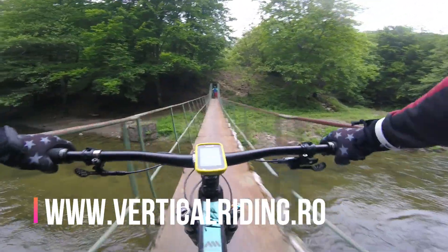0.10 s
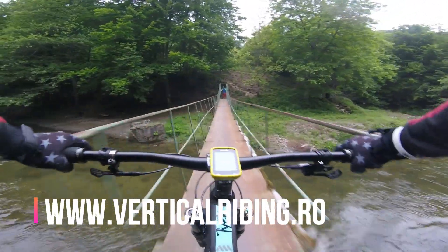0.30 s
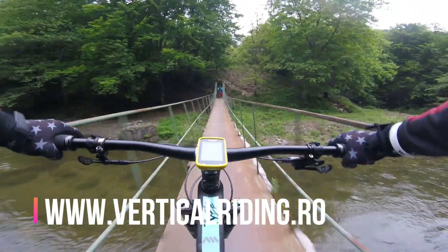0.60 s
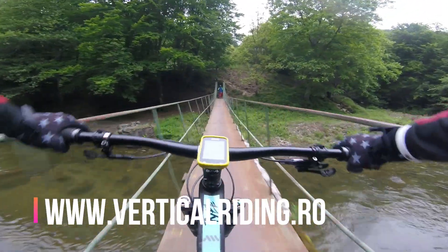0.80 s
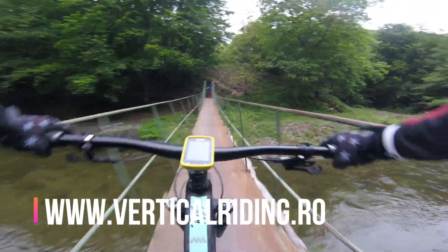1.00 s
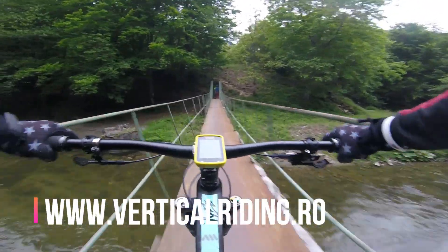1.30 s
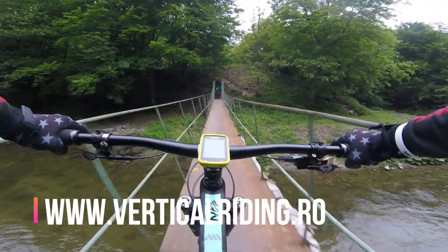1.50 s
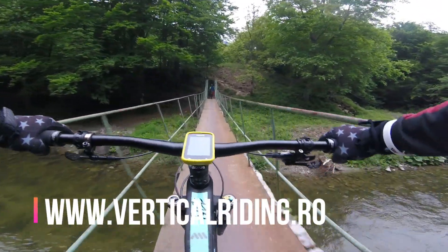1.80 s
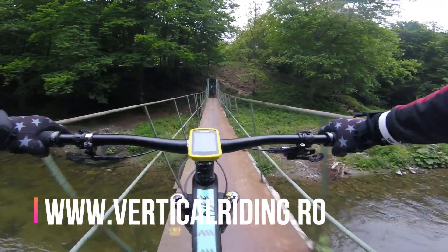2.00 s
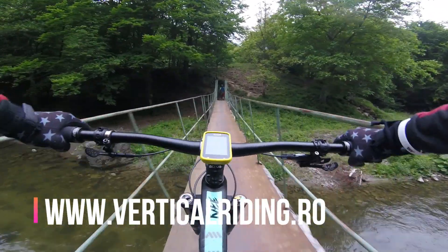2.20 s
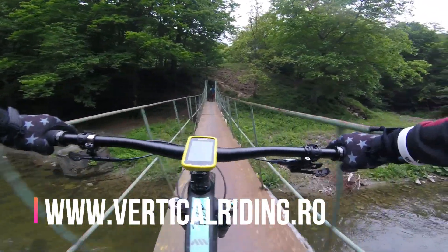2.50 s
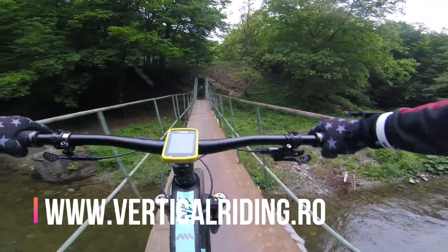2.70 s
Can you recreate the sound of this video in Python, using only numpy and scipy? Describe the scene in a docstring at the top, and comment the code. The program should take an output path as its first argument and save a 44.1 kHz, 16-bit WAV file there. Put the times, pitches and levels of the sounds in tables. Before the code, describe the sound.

Close on-bike sound outdoors: a bicycle coasts over metal deck plates, freehub buzzing steadily; a dull clack comes early, then sharp rattling jolts and hollow booms in bursts, over rolling rumble and faint water hiss.

```python
"""Mountain bike on a steel footbridge

A mountain bike rolls over a narrow steel footbridge above a river, heard from the rider's chest.
The freehub ticks in short noise bursts; at the joints the deck plates boom in decaying modes, with a
noise clatter and a tyre thud. Chain and cables rattle in showers of contacts, steel parts ring on, and
a loose part buzzes. Hard snaps and one dull clack ring in short modes. Shaped noise makes the
tyres' rumble and the river's rush."""
import sys
import numpy as np
from scipy import signal
from scipy.fft import rfft, irfft
from scipy.io import wavfile

SR = 44100
rng = np.random.default_rng(int(sys.argv[2]) if len(sys.argv) > 2 else 0)


def store_pcm(level_fs):
    """Save levels as 16-bit WAV."""
    pcm = np.round(np.clip(level_fs, -1, 1) * 32767).astype(np.int16)
    wavfile.write(sys.argv[1], SR, np.atleast_2d(pcm).T)


N = 125685  # length in samples

# Spectrum of chain, cables and buzzing part. Each row: frequency in Hz, relative level per Hz in dB.
RATTLE_COLOUR = [(300, -24.5), (1000, -12), (2000, -17.5), (3300, -14), (4200, -17.5), (4900, -6.5),
                 (5600, -1.5), (6100, -6.5), (6450, -0.5), (7100, -10), (7800, -13), (8600, -15.5),
                 (10000, -21), (12000, -42), (14000, -39), (16000, -55)]


def amp(db):
    """Decibels to gain."""
    return 10 ** (np.asarray(db) / 20)


def evened(x):
    """Scales to rms 1."""
    return x / np.sqrt(np.mean(x ** 2) + 1e-20)


def curve(points):
    """A control curve, drawn straight between (second, value) points, at every sample."""
    return np.interp(np.arange(N) / SR, *np.transpose(points))


def read(points, hz):
    """Reads a (Hz, value) table on a log-frequency axis."""
    f, value = np.transpose(points)
    return np.interp(np.log(hz + 1), np.log(f + 1), value)


def add(mix, s, sound):
    """Mixes a sound in at time s in seconds, cut at the end of the mix."""
    part = mix[max(round(s * SR), 0):][:len(sound)]
    part += sound[:len(part)]


def coloured(x, colour):
    """Passes x through a causal minimum-phase filter of unit energy with the given spectrum."""
    size = 4096
    hz = abs(np.fft.fftfreq(size, 1 / SR))
    log_gain = np.log(amp(read(colour, hz)))
    # the Hilbert transform of the log gain gives the minimum phase
    taps = np.fft.ifft(np.exp(np.conj(signal.hilbert(log_gain)))).real
    return signal.fftconvolve(x, taps / np.linalg.norm(taps))[:len(x)]


def dying(t, t60):
    """Falls 60 dB in t60 seconds."""
    return np.exp(-np.log(1000) * t / t60)


def onset(t, rise_s):
    """A straight attack."""
    return np.minimum(t / rise_s, 1)


def wobble(count, top_hz):
    """Irregular wavering of rms 1: 20 sines of random phase from a fifth of top_hz up to top_hz."""
    t = np.arange(count) / SR
    rates = np.geomspace(top_hz / 5, top_hz, 20)
    return evened(sum(np.sin(2 * np.pi * (f * t + rng.random())) for f in rates))


def ringing(modes, t, spread_db=0):
    """Sum of decaying sines, each mode at a random phase and with a random level spread in dB."""
    total = np.zeros(len(t))
    for f, db, t60 in modes:
        level = amp(db + spread_db * rng.standard_normal())
        total += level * dying(t, t60) * np.sin(2 * np.pi * (f * t + rng.random()))
    return total


def struck(modes, rise_s, pitch=1):
    """A small part rings with its modes, all starting in phase after a short attack."""
    t = np.arange(SR // 10) / SR
    ring = sum(amp(db) * dying(t, t60) * np.sin(2 * np.pi * f * pitch * t) for f, db, t60 in modes)
    return onset(t, rise_s) * ring


def freehub():
    """A pawl scrapes over each tooth and drops: one short noise burst per ratchet tooth."""
    # Ratchet speed, rising and falling with the cranks. Each row: time in seconds, ticks per second.
    tick_rate = [(0.0, 55.21), (0.2, 37.01), (0.25, 44.81), (0.45, 33.75), (0.65, 46.28), (0.95, 43.23),
                 (1.1, 47.8), (1.15, 60.06), (1.25, 38.8), (1.45, 43.21), (1.8, 37.83), (2.0, 44.79),
                 (2.35, 43.01), (2.45, 37.81), (2.5, 27.02), (2.7, 43.7), (2.8, 28.51), (2.85, 45.59)]
    # Strength of the pawl's tick before its colour. Each row: time in seconds, level in dB.
    tick_level = [(0, -37), (.22, -36.5), (.37, -35), (.48, -36.5), (.75, -41), (1.15, -41), (1.4, -40.5),
                  (2.0, -38.5), (2.45, -39), (2.7, -37.5), (2.85, -37.5)]
    # Spectrum of the ticks. Each row: frequency in Hz, relative level per Hz in dB.
    tick_colour = [(300, -14.5), (900, 0), (1300, -9.5), (2200, -3.5), (3100, -7), (4100, -18), (5200, -3),
                   (6000, -0.5), (6500, 2.5), (7200, -4), (8000, -14), (9200, -16.5), (11500, -40),
                   (13300, -36), (16000, -40)]
    start_tooth, spread_db = .04, 1
    rise_s, decay_s = .0032, .0031
    teeth = np.cumsum(curve(tick_rate)) / SR + start_tooth
    level = curve(tick_level)
    t, out = np.arange(SR // 20) / SR, np.zeros(N)
    shape = onset(t, rise_s) * np.exp(-np.maximum(t - rise_s, 0) / decay_s)
    # a tick falls wherever the tooth count passes a whole number
    for at in np.flatnonzero(np.diff(np.floor(teeth), prepend=-1)):
        strength = amp(level[at] + spread_db * rng.standard_normal())
        add(out, at / SR, strength * shape * rng.standard_normal(len(t)))
    return coloured(out, tick_colour)


def deck():
    """Each joint gives a thud and sets off the low plate modes and a dense clatter that dies by band."""
    # Wheels hit plate joints. Each row: start in seconds, boom, clatter and thud gains in dB.
    joints = [(.249, -33, -40, -47), (.532, -31, -32.5, -25), (.566, -51, -33.5, -37),
              (.62, -35.5, -37.5, -54), (.89, -50, -39, -39), (1.008, -42, -47, -34),
              (1.042, -44, -52, -35), (1.141, -52, -41.5, -34.5), (1.474, -29, -32, -24.5),
              (1.519, -42, -48, -36), (1.596, -31.5, -37.5, -25.5), (1.614, -35.5, -36, -32.5),
              (1.686, -33.5, -37.5, -32), (2.094, -27.5, -31.5, -27), (2.146, -29, -35, -29.5),
              (2.226, -37.5, -35.5, -29), (2.308, -34, -39, -39), (2.48, -54, -49.5, -34),
              (2.779, -44, -48.5, -41)]
    # Deck plate resonances. Each row: frequency in Hz, level in dB before spread, t60 in seconds.
    plate_modes = [(48, -2.5, 0.2), (89.7, -4, 0.49), (97.8, -2.5, 0.45), (116.7, -7, .45),
                   (162.7, -6.5, 0.69), (240, -8.5, 0.48), (285.4, -6, 0.47), (335.4, -11.5, 0.42)]
    # Dense upper ringing of the plates. Each row: frequency in Hz, relative level per Hz in dB.
    clatter_colour = [(30, -17), (150, 6.5), (320, 3), (520, 2.5), (900, -9.5), (1500, -7.5), (3000, -5),
                      (4200, -10), (5700, -13.5), (7000, -16.5), (9500, -45.5), (12000, -54), (16000, -34)]
    # How long that ringing lasts. Each row: band centre in Hz, t60 in seconds.
    clatter_t60 = [(60, 1), (300, 0.89), (900, 0.47), (2500, .45), (6000, 0.66), (14000, 0.31)]
    # The tyre's short blow on the plate edge. Each row: frequency in Hz, relative level per Hz in dB.
    thud_colour = [(30, -5), (90, -4.5), (180, 2), (300, 1.5), (430, -2.5), (650, -10.5), (1200, -20.5),
                   (3000, -36), (8000, -53)]
    rise_s, thud_decay_s = .00067, .015
    t, out = np.arange(SR) / SR, np.zeros(N)
    hz = np.fft.rfftfreq(SR, 1 / SR)
    centres, t60s = np.transpose(clatter_t60)
    # overlapping bands that add up to the whole spectrum
    bands = np.array([read(list(zip(centres, row)), hz) for row in np.eye(len(centres))])
    fades = dying(t, t60s[:, None])
    for s, boom_db, clatter_db, thud_db in joints:
        boom = ringing(plate_modes, t, spread_db=1)
        spectrum = rfft(coloured(rng.standard_normal(SR), clatter_colour))
        clatter = (irfft(spectrum * bands) * fades).sum(0)
        thud = coloured(rng.standard_normal(SR), thud_colour) * np.exp(-t / thud_decay_s)
        blow = amp(boom_db) * boom + amp(clatter_db) * clatter + amp(thud_db) * thud
        add(out, s, onset(t, rise_s) * blow)
    return out


def chain():
    """Clumped showers of tiny contacts that die away after each jolt."""
    # Chain and cables shaken against the frame.
    # Each row: start in seconds, level in dB before colour and decay, decay time constant in seconds.
    rattles = [(0.251, -31, 0.017), (0.388, -35, 0.0028), (.41, -36.5, 0.015), (0.53, -25, .008),
               (.535, -22, 0.017), (.565, -19.5, 0.016), (.619, -24.5, 0.019), (0.644, -29.5, 0.014),
               (.851, -42.5, 0.02), (0.887, -35, 0.013), (.898, -33.5, 0.015), (.966, -29.5, 0.0095),
               (1.042, -31.5, 0.008), (1.462, -26, 0.021), (1.481, -25, 0.018), (1.524, -39, .025),
               (1.59, -38.5, 0.051), (1.613, -19, 0.01), (1.619, -26, .02), (1.685, -19.5, .011),
               (1.691, -31, 0.021), (1.715, -31, 0.0093), (2.064, -39, 0.012), (2.094, -24.5, 0.018),
               (2.112, -32, 0.034), (2.149, -31.5, 0.053), (2.178, -31, 0.025), (2.212, -34.5, 0.069),
               (2.305, -38, 0.074)]
    rise_s, contacts_per_s, spread_db = .00054, 2800, 6.5
    contact_share = .8  # of the power; the rest is steady noise
    clump_db, clump_top_hz = 2, 225.6
    t, out = np.arange(SR // 3) / SR, np.zeros(N)
    for s, db, decay_s in rattles:
        sizes = amp(spread_db * rng.uniform(-0.91, 1, len(t)))
        signs = rng.choice([-1, 1], len(t))
        hits = rng.random(len(t)) < contacts_per_s / SR
        contacts = evened(sizes * signs * hits)
        noise = rng.standard_normal(len(t))
        shower = np.sqrt(contact_share) * contacts + np.sqrt(1 - contact_share) * noise
        shower = evened(shower * amp(clump_db * wobble(len(t), clump_top_hz)))
        add(out, s, amp(db) * onset(t, rise_s) * np.exp(-t / decay_s) * shower)
    return coloured(out, RATTLE_COLOUR)


def steel(x):
    """Adds the faint ring of the steel parts that x shakes, by convolution with their modes."""
    # Thin steel parts that ring on after each rattle.
    # Each row: frequency in Hz, relative level in dB, t60 in seconds.
    steel_modes = [(5170, -6, 0.28), (5020, -4, 0.11), (5150, -2.5, 0.21), (5650, -16.5, 0.051),
                   (5700, -11, 0.13), (5625, -2, 0.21), (5850, -2.5, 0.22), (5730, -11, 0.055),
                   (6060, -4.5, 0.15), (6620, 3, 0.052), (6460, -2, 0.11), (6970, -18, 0.071),
                   (6755, -18, 0.22), (6800, -19, 0.17)]
    ring = ringing(steel_modes, np.arange(SR // 3) / SR)
    return x + amp(-50) * signal.fftconvolve(x, ring)[:N]


def buzzes():
    """Fast chatter keeps one narrow resonance of a loose metal part ringing; it swells and fades."""
    # Each row: start in seconds, length in seconds, resonance in Hz, level in dB before the swell.
    buzz_rows = [(1.609, .035, 6440, -33), (2.144, 0.064, 5860, -30)]
    width_hz = 390
    out, radius = np.zeros(N), np.exp(-np.pi * width_hz / SR)
    for s, length, hz, db in buzz_rows:
        t = np.arange(0, length, 1 / SR)
        chatter = rng.standard_normal(len(t))
        pole = radius * np.exp(2j * np.pi * hz / SR)
        ring = signal.lfilter([1], [1, -pole], chatter).real
        swell = np.sqrt(np.sin(np.pi * t / length))
        add(out, s, amp(db) * swell * evened(coloured(ring, RATTLE_COLOUR)))
    return out


def snaps():
    """Bright, dead snaps of metal on metal: a few high modes, each snap slightly detuned."""
    # Hard metal-on-metal snaps. Each row: start in seconds, gain in dB.
    snap_rows = [(0.5362, -8), (0.543, -14), (.554, -9), (0.5639, -1.5), (0.5703, -13), (.6175, -1),
                 (0.646, -15), (1.4838, -25), (1.619, -30), (1.692, -12), (2.174, -23), (2.1815, -11.5)]
    # What a snap rings with. Each row: frequency in Hz before detuning, level in dB, t60 in seconds.
    snap_modes = [(5500, -6.5, 0.0071), (5710, 2, 0.0041), (6320, -8, 0.0081), (8200, -14, .004)]
    rise_s, detune = .00054, .013  # detune is a fraction of the pitch
    out = np.zeros(N)
    for s, db in snap_rows:
        pitch = 1 + detune * rng.standard_normal()
        add(out, s, amp(db) * struck(snap_modes, rise_s, pitch))
    return out


def clack():
    """One dull clack from a loose part close by, with a short dense ring."""
    # Each row: frequency in Hz, relative level in dB, t60 in seconds.
    clack_modes = [(181, -14, 0.013), (1060, -7.5, 0.0061), (1580, -0.5, 0.0053)]
    # The frame's short answer to the clack. Each row: frequency in Hz, relative level per Hz in dB.
    tail_colour = [(100, -9), (600, -9), (1000, 3.5), (1300, -4), (1580, 4), (2200, -12), (2900, -4),
                   (3700, -1), (4300, -20), (6000, -5), (10000, -42)]
    start_s, level_db, rise_s = .249, -9.5, .00018
    tail_db, tail_decay_s = -26, .011
    t, out = np.arange(SR // 10) / SR, np.zeros(N)
    # the minus sign makes the first swing negative
    add(out, start_s, -amp(level_db) * struck(clack_modes, rise_s))
    burst = rng.standard_normal(len(t)) * np.exp(-t / tail_decay_s)
    add(out, start_s, amp(tail_db) * coloured(burst, tail_colour))
    return out


def tyres():
    """Lumpy rolling rumble of the tyres on the deck: low noise with a wavering level."""
    # Each row: frequency in Hz, relative level per Hz in dB.
    rumble_colour = [(15, -8.5), (35, 2.5), (55, -3.5), (75, -1.5), (102, 4.5), (125, -5), (155, -3.5),
                     (195, -10), (300, -10), (420, -23.5), (800, -39.5), (2000, -58.5)]
    # Level of the rumble before its swell. Each row: time in seconds, level in dB.
    rumble_level = [(0, -41.5), (.45, -40), (.75, -35.5), (.92, -45), (1.1, -44.5), (1.28, -40),
                    (1.4, -45.5), (1.6, -45), (1.9, -38), (2.02, -44), (2.3, -34.5), (2.45, -40.5),
                    (2.62, -42), (2.85, -40)]
    swell_db = 2.5 * wobble(N, top_hz=25.11)
    rumble = evened(coloured(rng.standard_normal(N), rumble_colour))
    return amp(curve(rumble_level) + swell_db) * rumble


def river():
    """Rush of the water below: shaped noise whose level drifts."""
    # Each row: frequency in Hz, relative level per Hz in dB.
    river_colour = [(100, 7), (400, 2.5), (900, -1.5), (1400, -5), (2600, -8), (4200, -17.5), (5600, -8),
                    (6600, -9.5), (8000, -17.5), (9500, -24), (11500, -43), (14000, -71), (16000, -69)]
    # Level of the rush. Each row: time in seconds, level in dB.
    river_level = [(0, -42.5), (.45, -44), (.7, -43.5), (1.05, -48), (1.4, -47), (1.8, -43), (2.05, -45),
                   (2.5, -45.5), (2.85, -46)]
    return amp(curve(river_level)) * coloured(rng.standard_normal(N), river_colour)


def scene():
    """Everything at the one microphone on the rider's chest."""
    bike = freehub() + steel(chain()) + buzzes() + snaps() + clack()
    bridge = deck() + tyres()
    return (bike + bridge + river())[None]


def record(dry):
    """The recorder's band limit: a steep low-pass at 15.8 kHz."""
    low_pass = signal.firwin(511, 15800, window=("kaiser", 9), fs=SR)
    return signal.oaconvolve(dry, low_pass[None], "same")


dry = scene()
out = record(dry)
store_pcm(out)
```